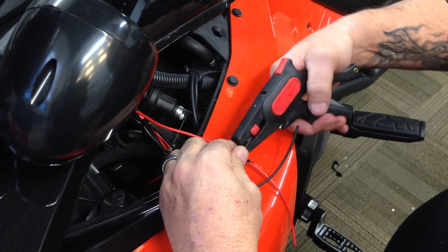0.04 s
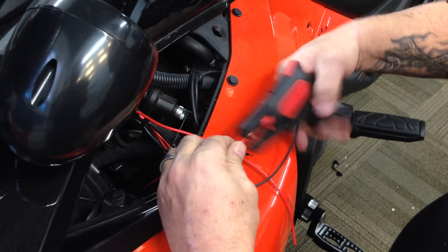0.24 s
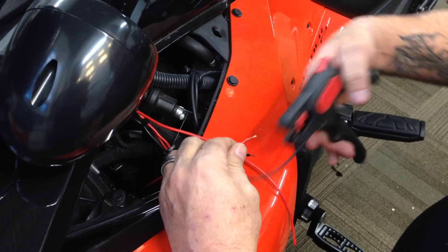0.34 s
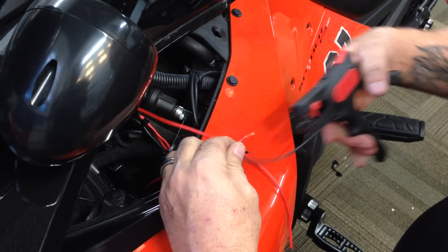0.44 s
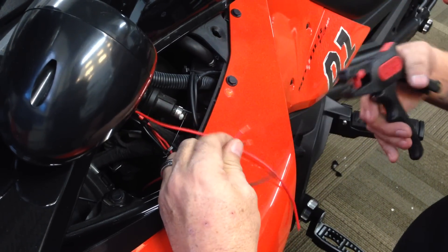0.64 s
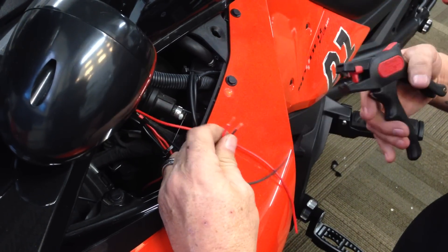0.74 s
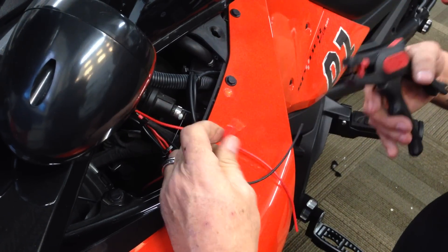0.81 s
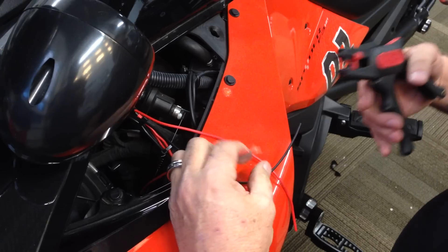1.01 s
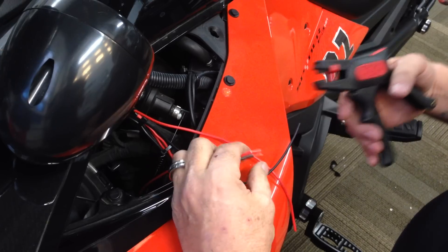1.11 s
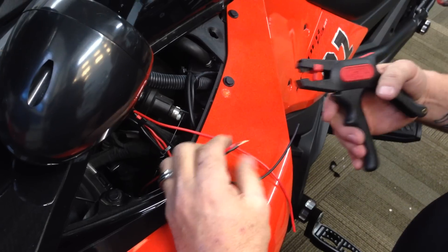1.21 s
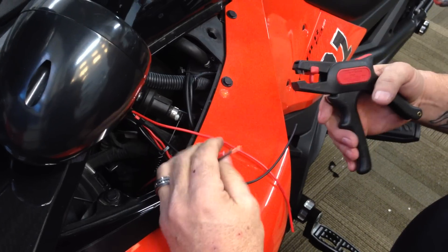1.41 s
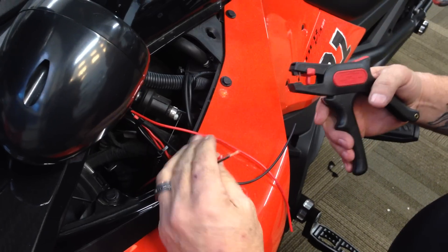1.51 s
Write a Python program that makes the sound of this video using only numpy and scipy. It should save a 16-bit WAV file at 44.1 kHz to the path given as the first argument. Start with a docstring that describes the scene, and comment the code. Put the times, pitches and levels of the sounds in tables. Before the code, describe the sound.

A spring-loaded wire stripper creaks faintly, snaps hard through insulation with a soft thud, then clacks back twice; lighter plastic knocks and small ticks follow. Close mono microphone in a workshop with faint room noise.

```python
"""In a workshop, close by, an automatic wire stripper creaks under the squeeze and its jaws snap through insulation.
The sprung slide flies back in two clacks; light plastic knocks and small ticks follow as the grip relaxes.
Each click is a few contacts in quick succession, each a noise crack plus damped modes; bumps ring hollow plastic.
A thud follows the snap, and filtered noise serves as room response, over faint hiss, low rumble and hum."""
import sys
import numpy as np
from scipy import signal
from scipy.fft import rfft, irfft
from scipy.io import wavfile
from scipy.ndimage import uniform_filter1d

SR = 44100
rng = np.random.default_rng(int(sys.argv[2]) if len(sys.argv) > 2 else 0)


def generate_wav(signal):
    """Clip the signal to [-1, 1] and save it as 16-bit WAV at the path in sys.argv[1]."""
    frames = np.transpose(np.atleast_2d(signal))
    scaled = np.clip(frames, -1, 1) * 32767
    pcm = np.round(scaled).astype(np.int16)
    wavfile.write(sys.argv[1], SR, pcm)


N = 68355  # length of the scene in samples

# Background: spectra of rumble and hiss [f/Hz, relative density/dB per Hz]
RUMBLE = [(20, -27.5), (65, 0), (120, -5.5), (200, -3), (320, -12.5), (1200, -36.5)]
AIR = [(240, -36.5), (400, -4), (1300, -16), (2700, -14.5), (4000, -15.5), (15000, -21)]
# Lines of the ventilation hum [f/Hz, relative level/dB]
HUM = [(118, -3.5), (199, -4), (290, -2), (479, -7)]
# Level curves of rumble, hum and hiss [t/s, level/dB]
RUMBLE_LEVEL = [(0, -63.5), (0.15, -60.5), (0.32, -71.5), (0.52, -70.5), (1.55, -63)]
HUM_LEVEL = [(0.4, -80), (1.2, -70.5)]
AIR_LEVEL = [(0.17, -64), (0.3, -70), (1.3, -70), (1.55, -67)]

# In all contact tables: crack t60 holds at 4 kHz, level precedes any low cut,
# and ring level is relative to the crack in the direct sound.
# Small ticks of the spring, the early ones bunched into a creak
# [t/s, level/dB, crack t60/s, tilt/dB per octave, pitch ratio]
TICKS = [(0.0083, -44, .011, 0.5, 1.054), (0.0409, -48, 0.013, 2, 0.94), (0.0479, -47, 0.014, 3, 1.09),
         (0.0528, -48, 0.013, 0.5, 1.3), (0.0590, -44.5, 0.022, 2.5, 1), (0.0668, -50, .016, -4, 1.3),
         (0.3320, -47.5, 0.018, 2.5, 1.1), (0.963, -59, .03, -9.5, 1.09), (1.0678, -38.5, 0.022, 0.5, .98),
         (1.0775, -51, 0.029, -1.5, 0.84), (1.2494, -46.5, 0.016, 1, 1.046), (1.3523, -59.5, .016, 0, 1.02)]
# Bumps of the hollow plastic [t/s, level/dB, f/Hz, t60/s]
BUMPS = [(0.0691, -51.5, 728, 0.02), (0.6890, -57, 712, 0.042), (0.758, -47, 1006, 0.048)]
# Contacts of the jaws as they snap [t/s, level/dB, crack t60/s, tilt/dB per octave]
SNAPS = [(0.2003, -25.5, 0.052, 1.5), (0.2028, -23, .016, 5.5), (0.2047, -19.5, 0.0098, 0),
         (0.2060, -19.5, 0.011, 1.5)]
# Contacts of the slide as it breaks loose and in a later light click, and against its stop
# [t/s, level/dB, crack t60/s, tilt/dB per octave, ring level/dB, low edge f/Hz]
SLIDE_CLICKS = [(0.3665, -33, 0.016, -5.5, -5.5, 1996), (0.3697, -32.5, 0.026, -1.5, -1, 2820),
                (0.3719, -21.5, 0.0089, -2.5, 4, 3000), (0.6655, -40, 0.019, -2.5, -0.5, 1100)]
STOP_CLACKS = [(0.417, -27, 0.021, 2, -5, 2240), (0.4193, -20.5, 0.016, 1, -2.5, 1330),
               (0.422, -26, .02, 0.5, -9.5, 780), (0.4290, -36.5, 0.0277, -1, -1.5, 2000),
               (0.4418, -31, 0.031, -1.5, 2, 2560), (0.5147, -51.5, 0.02, -5, -6, 1510)]
# Knocks of the plastic handles
# [t/s, level/dB, crack t60/s, tilt/dB per octave, ring level/dB, low edge f/Hz]
KNOCKS = [(0.6878, -49, 0.033, -1.5, -12, 298), (0.7134, -44, 0.027, -1, -15, 690),
          (0.7546, -34.5, 0.017, -1, -1, 151)]

# Modes of each part; spring pitches are those at ratio one [f/Hz, relative level/dB, t60/s]
SPRING_MODES = [(2280, -8, .035), (3190, 0.5, 0.0084), (3580, -6.5, .025), (4290, -3.5, 0.023)]
JAW_MODES = [(1247, -6, .022), (2340, -1.5, 0.023), (2520, -3, 0.021), (3155, -5.5, 0.039),
             (3490, -7, 0.025), (4040, -3.5, .022), (4223, -8.5, 0.024), (4840, -3.5, 0.014),
             (5180, 1.5, .017), (5400, -0.5, 0.016), (12900, -3.5, .01)]
SLIDE_MODES = [(3510, -4, .012), (3980, 1, 0.014), (4600, -1, 0.016), (5080, 0.5, .012), (7840, -4, .014),
               (9470, -3, 0.0077)]
STOP_MODES = [(3420, -3.5, .018), (3870, -1, .017), (4180, -2, 0.012), (6330, -10, 0.075)]
HANDLE_MODES = [(573, -12, 0.038), (1270, -2, 0.026), (1456, 1.5, 0.027), (2250, -2, 0.011),
                (2528, 2, 0.021)]
# Dense short-lived modes of each part's crack, before tilt and pitch ratio
# [f/Hz, relative density/dB per Hz]
SPRING_CRACK = [(300, -42.5), (1100, -27), (1900, -8.5), (2800, -6.5), (3300, 8), (4600, -6.5),
                (5500, -19.5), (7500, -18), (15500, -36.5)]
JAW_CRACK = [(100, -25), (450, -16.5), (750, -9), (1300, -4), (1750, -9), (2300, 1.5), (2900, -6),
             (3400, -3.5), (5800, 1), (7500, -2.5), (13200, -8.5), (15500, -17.5)]
SLIDE_CRACK = [(150, -42), (900, -19), (1450, -9.5), (2900, -7.5), (3300, 0), (5000, -3.5), (6500, -3.5),
               (9000, -7.5), (12000, -14), (15500, -17.5)]
HANDLE_CRACK = [(150, -16.5), (800, -15.5), (1400, -2.5), (2900, -3.5), (4400, 1), (6700, 0), (10000, -8.5),
                (15500, -19)]
# Hollow resonance [multiple of the pitch, relative density/dB per Hz]
HOLLOW = [(.3, -18), (.55, -10), (.8, -11), (1, 3), (1.2, -10.5), (1.5, -4.5), (3, -26)]
# Thud of the body panel, and the workshop's reverberation [f/Hz, relative density/dB per Hz]
THUD = [(40, -21.5), (140, 3), (240, 2), (450, -19.5), (900, -34)]
ROOM = [(150, 0), (830, -4), (1450, 3.5), (3500, 2.5), (6000, -1.5), (15000, -9.5)]

# Time constants of build-up
JAW_RISE_S, SLIDE_RISE_S, HANDLE_RISE_S, SPRING_RISE_S = 0.0004, 0.000537, 0.0001, 0.00074
HOLLOW_RISE_S = 0.00095
JAW_RING_DB, SPRING_RING_DB = 0.5, -5  # ring relative to crack, direct sound
TREBLE_DAMPING = 0.25  # a crack's t60 falls with frequency to this power
THUD_S, THUD_DB, THUD_RISE_S, THUD_T60_S = 0.205, -45 + 20 * np.log10(2), 0.025, 0.17

ROOM_DB, ROOM_T60_S, ROOM_DAMPING, ROOM_RISE_S = -22, 0.52, 0.94, 0.0066  # t60 at 4 kHz
# Scatter from nearby surfaces; the delay also applies to the diffuse tail
NEAR_DB, NEAR_T60_S, NEAR_RISE_S, NEAR_DELAY_S = -20, 0.06, 0.00094, 0.0065
ROOM_RING_DB = -22  # heard from all directions at once, the modes stand out less
# Level of each part as sent to the room, relative to the jaws
SLIDE_ROOM_DB, HANDLE_ROOM_DB, SPRING_ROOM_DB, HOLLOW_ROOM_DB = -1.5, -4, 0, 6.5
TOP_HZ = 15250  # upper edge of the recorder's passband


def undb(db):
    """Amplitude ratio: twenty decibels make a factor of ten."""
    return 10 ** (np.asarray(db) / 20)


def unit(x):
    """Energy normalisation: the squared samples sum to one."""
    return x / np.sqrt(np.sum(x ** 2) + 1e-18)


def unit_5ms(x):
    """Energy equivalence: as much energy as 5 ms of a signal of rms one."""
    return unit(x) * np.sqrt(0.005 * SR)


def decay(t, t60):
    """Exponential damping: amplitude falls by 60 dB in each t60."""
    return np.exp(-np.log(1000) * t / t60)


def build_up(t, rise_s):
    """First-order rise: amplitude approaches one exponentially."""
    return 1 - np.exp(-t / rise_s)


def add(out, start_s, x):
    """Superposition: a sound is summed in from its onset."""
    i = int(np.clip(round(start_s * SR), 0, N - 1))
    out[i:i + len(x)] += x[:N - i]


def gains(points, hz):
    """Spectral envelope: decibels interpolated over log frequency."""
    f, db = np.array(points, float).T
    return undb(np.interp(np.log(hz + 1), np.log(f), db))


def transpose(table, factor):
    """Frequency scaling: a spectrum or set of modes shifts by one ratio."""
    return [(f * factor, *rest) for f, *rest in table]


def causal(x, gain):
    """Minimum phase: the folded cepstrum of a gain makes its filter ring only after the cause."""
    cepstrum = irfft(np.log(gain + 1e-9))
    half = len(cepstrum) // 2
    cepstrum[1:half] *= 2
    cepstrum[half + 1:] = 0
    response = np.exp(rfft(cepstrum))
    return irfft(rfft(x, len(cepstrum)) * response)


def low_cut(x, hz):
    """High-pass filtering: a second-order slope thins the body below an edge."""
    return signal.sosfilt(signal.butter(2, hz, "high", fs=SR, output="sos"), x)


def noise(points):
    """Stationary random sound: white noise weighted by a spectrum, at rms one."""
    hz = np.fft.rfftfreq(N, 1 / SR)
    spectrum = rfft(rng.standard_normal(N)) * gains(points, hz)
    return unit(irfft(spectrum, N)) * np.sqrt(N)


def burst(points, rise_s, t60, damping, size=8192):
    """Dense modes: noise damped octave by octave, evened out to a given colour."""
    t, hz = np.arange(size) / SR, np.fft.rfftfreq(size, 1 / SR)
    octave = np.clip(np.log2((hz + 1) / 4000), -4, 2)
    white, x = rfft(rng.standard_normal(size)), 0
    for k in range(-4, 3):  # octaves from 4 kHz, with overlapping triangular bands
        band = irfft(white * np.maximum(1 - abs(octave - k), 0))
        x = x + band * decay(t, max(t60, 1e-3) * 2 ** (-k * damping))
    x = x * build_up(t, rise_s)
    # power averaged over 300 Hz
    smooth = np.sqrt(uniform_filter1d(abs(rfft(x)) ** 2, int(300 * size / SR)))
    return unit(causal(x, gains(points, hz) / smooth))


def contact(modes, crack, rise_s, ring_db, db, t60, tilt, size=8192):
    """Impact excitation: a crack plus damped modes, tilted above 1 kHz by the hardness of contact."""
    t, hz = np.arange(size) / SR, np.fft.rfftfreq(size, 1 / SR)
    ring = 0
    for k, (f, mode_db, life) in enumerate(modes):
        sign = (-1) ** k
        ring = ring + sign * undb(mode_db) * np.sin(2 * np.pi * f * t) * decay(t, life)
    ring = unit(ring * build_up(t, rise_s))
    x = burst(crack, rise_s, t60, TREBLE_DAMPING) + undb(ring_db) * ring
    x = causal(x, undb(tilt * np.log2(np.maximum(hz, 1000))))
    return unit_5ms(x) * undb(db)


def impacts(contacts, modes, crack, rise_s, shift_db):
    """Successive impacts: each contact has its own ring level and low edge."""
    out = np.zeros(N)
    for s, db, t60, tilt, ring_db, low_hz in contacts:
        x = contact(modes, crack, rise_s, ring_db + shift_db, db, t60, tilt)
        add(out, s, low_cut(x, low_hz))
    return out


def background():
    """Superposed steady sources: hiss and rumble sink to a quieter level after the snap and swell late; hum rises."""
    t = np.arange(N) / SR
    hum = np.zeros(N)
    for hz, db in HUM:
        phase = rng.random()  # in cycles
        hum += undb(db) * np.sqrt(2) * np.sin(2 * np.pi * (hz * t + phase))

    def level(curve):
        """Slow modulation: gain follows decibels interpolated in time."""
        return undb(np.interp(t, *np.array(curve).T))

    rumble = level(RUMBLE_LEVEL) * noise(RUMBLE)
    hiss = level(AIR_LEVEL) * noise(AIR)
    return rumble + level(HUM_LEVEL) * hum + hiss


def spring_ticks(shift_db):
    """Transposed resonance: each tick of the spring scales its modes and crack by one pitch ratio."""
    out = np.zeros(N)
    for s, db, t60, tilt, pitch in TICKS:
        modes, crack = transpose(SPRING_MODES, pitch), transpose(SPRING_CRACK, pitch)
        add(out, s, contact(modes, crack, SPRING_RISE_S, SPRING_RING_DB + shift_db, db, t60, tilt))
    return out


def hollow_bumps():
    """Hollow-body resonance: bumped plastic rings low and woody, damped alike at all frequencies."""
    out = np.zeros(N)
    for s, db, hz, t60 in BUMPS:
        body = burst(transpose(HOLLOW, hz), HOLLOW_RISE_S, t60, 0)
        add(out, s, unit_5ms(body) * undb(db))
    return out


def jaw_snaps(shift_db):
    """Clustered impacts: the jaws excite one set of modes several times within milliseconds."""
    out = np.zeros(N)
    for s, db, t60, tilt in SNAPS:
        add(out, s, contact(JAW_MODES, JAW_CRACK, JAW_RISE_S, JAW_RING_DB + shift_db, db, t60, tilt))
    return out


def thud():
    """Recoil: the body panel answers the snap with low noise that rises softly and decays."""
    age = np.maximum(np.arange(N) / SR - THUD_S, 0)
    return undb(THUD_DB) * noise(THUD) * build_up(age, THUD_RISE_S) * decay(age, THUD_T60_S)


def slide_clacks(shift_db):
    """Modal excitation: one set of modes as the slide breaks loose and clicks later, another at its stop."""
    clicks = impacts(SLIDE_CLICKS, SLIDE_MODES, SLIDE_CRACK, SLIDE_RISE_S, shift_db)
    stop = impacts(STOP_CLACKS, STOP_MODES, SLIDE_CRACK, SLIDE_RISE_S, shift_db)
    return clicks + stop


def handle_knocks(shift_db):
    """Damped plastic impacts: knocks excite the short-lived modes of the handles."""
    return impacts(KNOCKS, HANDLE_MODES, HANDLE_CRACK, HANDLE_RISE_S, shift_db)


def stripper(shift_db):
    """Independent radiators: one track per part; the shift sets how far the modes stand out."""
    return jaw_snaps(shift_db), slide_clacks(shift_db), handle_knocks(shift_db), spring_ticks(shift_db)


def workshop(x):
    """Reverberation: convolution with quick scatter from nearby surfaces and a diffuse tail."""
    tail = burst(ROOM, ROOM_RISE_S, ROOM_T60_S, ROOM_DAMPING, size=32768)
    scatter = burst(ROOM, NEAR_RISE_S, NEAR_T60_S, ROOM_DAMPING)
    response = np.zeros(N)
    add(response, NEAR_DELAY_S, undb(NEAR_DB) * scatter)
    add(response, NEAR_DELAY_S, undb(ROOM_DB) * tail)
    return signal.fftconvolve(x, response)[:N]


def scene():
    """Superposition of direct sound, room response and background in one channel."""
    hollow = hollow_bumps()
    jaws, slide, handles, spring = stripper(ROOM_RING_DB)
    radiated = jaws + undb(SLIDE_ROOM_DB) * slide + undb(HANDLE_ROOM_DB) * handles
    radiated = radiated + undb(SPRING_ROOM_DB) * spring + undb(HOLLOW_ROOM_DB) * hollow
    direct = sum(stripper(0)) + hollow + thud()
    return (direct + workshop(radiated) + background())[None]


def record(dry):
    """Band limitation: the recorder's steep elliptic low-pass cuts the top."""
    return signal.sosfilt(signal.ellip(10, 0.2, 70, TOP_HZ, fs=SR, output="sos"), dry)


dry = scene()
out = record(dry)
generate_wav(out)
```